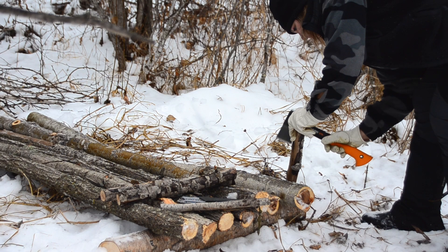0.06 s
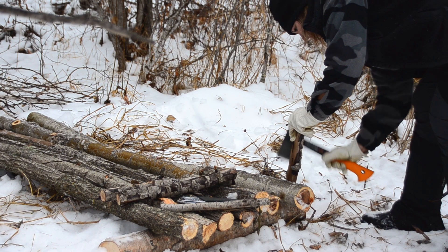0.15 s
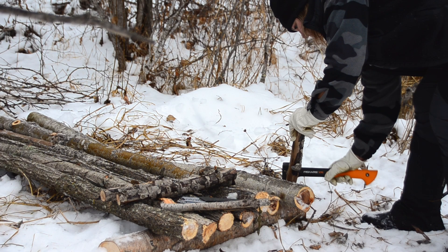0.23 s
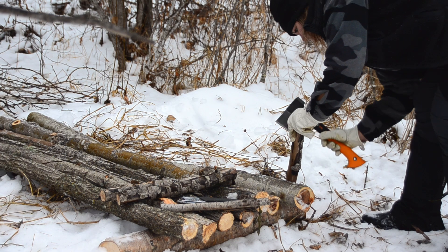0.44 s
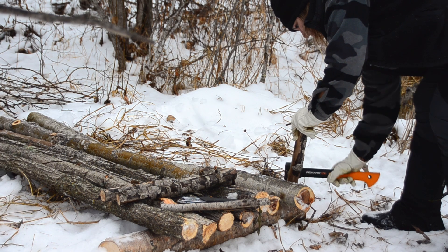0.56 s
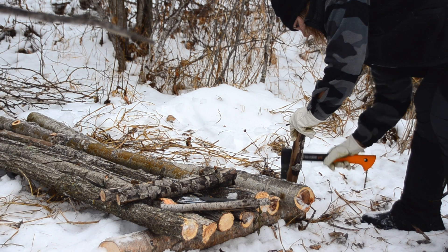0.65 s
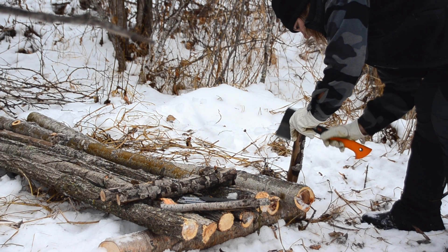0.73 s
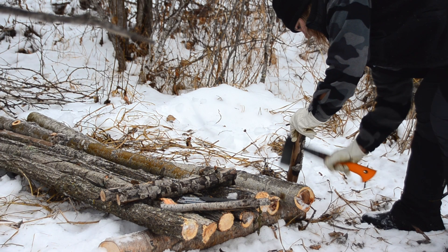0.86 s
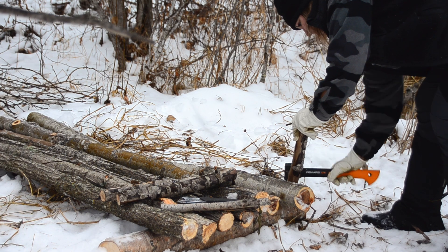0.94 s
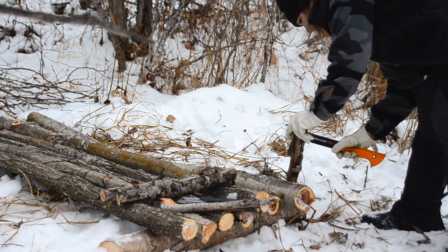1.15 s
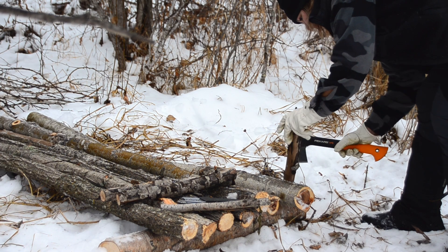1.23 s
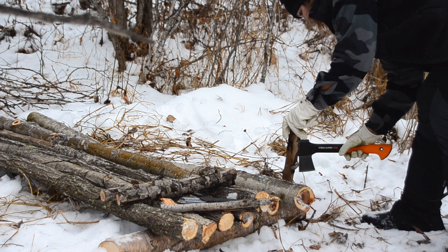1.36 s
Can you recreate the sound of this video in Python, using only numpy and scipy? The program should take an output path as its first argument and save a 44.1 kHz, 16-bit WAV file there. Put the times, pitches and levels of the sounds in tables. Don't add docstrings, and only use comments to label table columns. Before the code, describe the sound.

Three quick, dry hatchet blows on wood, the first with the deepest log boom, the later ones with sharper bites, ring out close to the microphone among trees over a low hum, ending in light ticks of debris.

```python
import sys
import numpy as np
from scipy import signal
from scipy.fft import rfft, irfft, next_fast_len
from scipy.io import wavfile
from scipy.ndimage import map_coordinates

SR = 44100
rng = np.random.default_rng(int(sys.argv[2]) if len(sys.argv) > 2 else 0)


def dump(signal):
    limited = np.clip(np.atleast_2d(signal).T, -1, 1)
    pcm = np.round(limited * 32767).astype(np.int16)
    wavfile.write(sys.argv[1], SR, pcm)


def nominal_scale(level):
    x = np.asarray(level, float) / 20
    return 10 ** x


N = 61739
LEAD = SR // 4
T = np.arange(SR // 4) / SR


def unit(x):
    return x / np.sqrt(np.mean(x ** 2) + 1e-20)


def along(points, hz):
    f, v = np.transpose(points)
    return np.interp(np.log(hz + 1), np.log(f + 1), v)


def filtered(x, response):
    m = next_fast_len(len(x) + 8192)
    spectrum = rfft(x, m) * response(np.fft.rfftfreq(m, 1 / SR))
    return irfft(spectrum, m)[:len(x)]


def noise(spectrum, size):
    white = rng.standard_normal(size)
    return unit(filtered(white, lambda hz: nominal_scale(along(spectrum, hz))))


def wobble(rate, size):
    knots = rng.standard_normal(size // 16)
    return map_coordinates(knots, [np.arange(size) * rate / SR])


def swell(rise_s):
    return 1 - np.exp(-T / rise_s)


def decaying_sines(modes):
    return sum(nominal_scale(db - 60 * T / t60) * np.sin(2 * np.pi * hz * T) for hz, db, t60 in modes)


def add(track, s, sound):
    part = track[LEAD + round(s * SR):][:len(sound)]
    part += sound[:len(part)]


def ring(modes, contact_s, rise_cycles):
    contact = max(contact_s * SR, 1)
    push = np.sin(np.pi * np.arange(0.5, contact) / contact)
    free = np.zeros(len(T))
    for hz, db, t60 in modes:
        onset = 1 - np.exp(-T * hz / rise_cycles)
        free += nominal_scale(db - 60 * T / t60) * onset * np.sin(2 * np.pi * hz * T)
    return np.convolve(free, push / push.sum())[:len(T)]


# (frequency [Hz], level [dB], t60 [s])
BLADE_MODES = [(604, -9.5, 0.016), (920, -13, 0.018), (1380, 4.5, 0.0058), (2410, -7.5, 0.003),
               (2923, -4.5, 0.0081), (4950, -21, 0.014), (8630, -11, 0.0087)]


def bite(db):
    return nominal_scale(db + 4.5) * ring(BLADE_MODES, contact_s=0.00014, rise_cycles=0.7)


# (frequency [Hz], level [dB])
FIBRE_COLOUR = [(400, -44), (1500, -1), (3000, -0.5), (5000, 0.5), (6000, -1.5), (8500, -3), (11000, -15),
                (16000, -54)]


def split(length_s, db, first_hz, last_hz):
    glide_s, rough, fade_s = 0.0040, 0.8, 0.001
    hz = last_hz + (first_hz - last_hz) * np.exp(-(T / glide_s) ** 2)
    phase = 2 * np.pi * np.cumsum(hz) / SR + rough * wobble(940, len(T))
    whistle = np.sin(phase) * np.exp(rough * wobble(630, len(T)) / 2)
    fizz = nominal_scale(-6 + 3 * wobble(500, len(T))) * noise(FIBRE_COLOUR, len(T))
    gate = np.clip(T / 0.0007, 0, 1) * np.exp(-np.clip(T - length_s, 0, None) / fade_s)
    return nominal_scale(db) * gate * (whistle + fizz)


# (frequency [Hz], level [dB], t60 [s])
LOG_MODES = [(880, -10.5, 0.02), (1107, -7, 0.019), (1307, -0.5, 0.0083), (1672, -5.5, 0.0092),
             (2052, -12, 0.024), (2290, -6, 0.02), (3310, -1, 0.0061), (4360, -40, .015)]


def knock(db, contact_s, crack_db):
    crack_t60_s, crack_rise_s = 0.0099, 0.00014
    crack = nominal_scale(crack_db - 60 * T / crack_t60_s) * swell(crack_rise_s) * noise(FIBRE_COLOUR, len(T))
    return nominal_scale(db) * ring(LOG_MODES, contact_s, rise_cycles=0.24) + crack


# (frequency [Hz], level [dB], t60 [s])
BODY_MODES = [(323, -16.5, 0.039), (460.4, -1, 0.036), (600, -27.5, 0.0081)]


def boom(db, swell_s):
    return nominal_scale(db) * swell(swell_s) ** 2 * decaying_sines(BODY_MODES)


# (frequency [Hz], level [dB])
SPRAY_COLOUR = [(800, -50), (2500, -6.5), (4500, 4.5), (8000, 6.5), (11000, -13.5), (14000, -15),
                (17000, -60)]


def spray(db, t60_s):
    return nominal_scale(db - 60 * T / t60_s) * swell(0.0028) * noise(SPRAY_COLOUR, len(T))


# (time [s], level [dB], spray level [dB], spray t60 [s])
BITES = [
    (0.2256, -11.5, -52, 0.17),
    (0.5648, -7, -37.5, 0.18),
    (0.9240, -6.5, -41, 0.3),
]
# (time [s], length [s], level [dB], first pitch [Hz], last pitch [Hz])
SPLITS = [
    (0.2260, .0048, -27, 2600, 3300),
    (0.5660, .0112, -23, 1500, 3250),
    (0.9250, .0044, -18, 2900, 3050),
]
# (time [s], level [dB], contact length [s], crack level [dB])
KNOCKS = [
    (0.232, -8, .0002, -17.5),
    (0.2327, -6, 0.00021, -24.5),
    (0.2346, -3.5, 0.00031, -37),
    (0.5784, -17, .0002, -30),
    (0.5800, -11, 0.00072, -32),
    (0.9302, -12.5, 0.00012, -15),
    (0.9309, -8.5, 0.00012, -29),
]
# (time [s], level [dB], swell [s])
BOOMS = [
    (0.2312, 6, 0.0027),
    (0.5789, -16, 0.0018),
    (0.9318, -7, 0.0023),
]


def chops():
    tracks = np.zeros((len(BITES) + 1, LEAD + N))
    for track, (s, db, *thrown), (tear_s, *tear) in zip(tracks, BITES, SPLITS):
        add(track, s, bite(db) + spray(*thrown))
        add(track, tear_s, split(*tear))
    for track, (s, *row) in zip(tracks, BOOMS):
        add(track, s, boom(*row))
    for s, *row in KNOCKS:
        nearest = np.argmin([abs(s - b[0]) for b in BITES])
        add(tracks[nearest], s, knock(*row))

    earlier_s, earlier_db = -0.073, -7
    add(tracks[-1], earlier_s, bite(earlier_db) + nominal_scale(earlier_db + 4.5) * split(*SPLITS[-1][1:]))

    def thin(f):
        radiates_hz = 292
        return (-f * f / (radiates_hz ** 2 - f * f + 1.2j * f * radiates_hz)) ** 2
    return np.array([filtered(x, thin) for x in tracks])


def thumps():
    track = np.zeros(LEAD + N)
    ground = [(38, -49.5, 0.31), (86, -41, 0.15), (184, -36, 0.067)]  # (Hz, dB, t60 s)
    thump = swell(0.0027) * decaying_sines(ground)
    for s, db, _ in BOOMS:
        add(track, s, nominal_scale(db * 0.39) * thump)
    return track


# (time [s], level [dB], pitch [Hz], length [s])
TICKS = [
    (0.370, -68, 9000, .002),
    (0.834, -71.5, 6500, .005),
    (1.185, -64.5, 3140, 0.0068),
    (1.275, -63, 8350, 0.0012),
    (1.299, -65, 4030, 0.0044),
    (1.306, -57, 1440, .008),
    (1.313, -55.5, 3010, 0.0057),
    (1.314, -57.5, 4760, 0.0056),
    (1.328, -59, 2950, 0.0035),
]


def ticks():
    track = np.zeros(LEAD + N)
    for s, db, hz, length_s in TICKS:
        colour = [(hz * 0.18, -40), (hz * 0.845, -9), (hz, 0), (hz * 1.11, -9), (hz * 2.05, -26), (hz * 3, -80)]
        envelope = (T / length_s * np.exp(1 - T / length_s)) ** 2
        add(track, s, nominal_scale(db) * noise(colour, len(T)) * envelope)
    return track


def echo(x, t60s, delay_s):
    hz, t, z = signal.stft(rng.standard_normal(SR), SR, nperseg=128)
    decay = nominal_scale(-60 * t / along(t60s, hz)[:, None])
    tail = signal.istft(z * decay, SR, nperseg=128)[1]
    tail = np.pad(tail, (round(delay_s * SR), 0))
    return signal.fftconvolve(x, tail / np.linalg.norm(tail))[:len(x)]


# (frequency [Hz], t60 [s])
NEAR_DECAY = [(200, 0.13), (1000, .22), (4000, 0.28), (12000, 0.2)]
# (frequency [Hz], t60 [s])
WOOD_DECAY = [(200, 0.23), (1500, 0.92), (5000, 0.55), (12000, 0.32)]
# (frequency [Hz], level [dB])
ECHO_COLOUR = [(100, -14), (300, 4.5), (500, -3), (1200, -3.5), (3000, -4.5), (8000, 3.5), (14000, 2)]


def trees_answer(tracks):
    scatter = np.exp(1j * 2.13 * wobble(900, LEAD + N))
    wet = np.zeros(LEAD + N)
    for x in np.real(signal.hilbert(tracks) * scatter):
        wet += nominal_scale(-16.5) * echo(x, NEAR_DECAY, delay_s=0.004)
        wet += nominal_scale(-25.5) * echo(x, WOOD_DECAY, delay_s=0.036)
    return filtered(wet, lambda hz: nominal_scale(along(ECHO_COLOUR, hz)))


# (frequency [Hz], level [dB per Hz])
HUM_COLOUR = [(15, -61), (25, -35), (107, -13.5), (201, -6), (294, -2.5), (437, -1.5), (559, -1.5),
              (1300, -22), (1690, -70), (2860, -120)]
# (frequency [Hz], level [dB per Hz])
AIR_COLOUR = [(300, -57), (800, 5.5), (1300, -4), (2500, -10), (5000, -17), (9000, -22.5), (13000, -35),
              (16000, -42)]


def background():
    sway = nominal_scale(wobble(6.6, N) + wobble(27, N))
    hum = nominal_scale(-51.5) * unit(sway * noise(HUM_COLOUR, N))
    air = nominal_scale(-62.5 + 1.8 * wobble(1.7, N)) * noise(AIR_COLOUR, N)
    return hum + air


def scene():
    tracks = chops()
    events = tracks.sum(0) + trees_answer(tracks) + thumps() + ticks()
    return (events[LEAD:] + background())[None]


# (time [s], lost above [Hz], share lost [0-1])
DROPOUTS = [
    (0.107, 2800, .75),
    (0.280, 4000, .6),
    (0.728, 3500, .7),
    (0.812, 5000, .8),
    (0.982, 4000, .6),
    (1.299, 5200, .85),
]


def treble_dropouts(x):
    t, width_s = np.arange(N) / SR, 0.0048
    lost = np.zeros(N)
    for s, above_hz, share in DROPOUTS:
        dropout = share * np.exp(-((t - s) / width_s) ** 4)
        lost += dropout * filtered(x, lambda f: f > above_hz)
    return x - lost


def top_cut(x):
    return signal.sosfilt(signal.butter(12, 16010, fs=SR, output="sos"), x)


def record(dry):
    def dip(f):
        notch_hz, wide_hz, depth = 5746, 402, 0.97
        return 1 - depth * 1j * f * wide_hz / (notch_hz ** 2 - f * f + 1j * f * wide_hz)
    mix = treble_dropouts(filtered(dry[0], dip))[None]
    return top_cut(mix)


dry = scene()
out = record(dry)
dump(out)
```